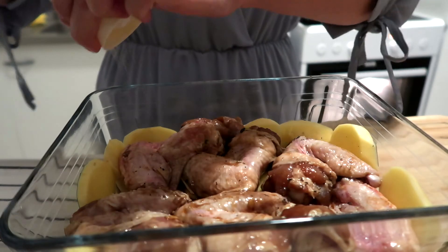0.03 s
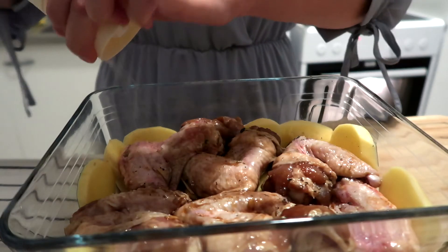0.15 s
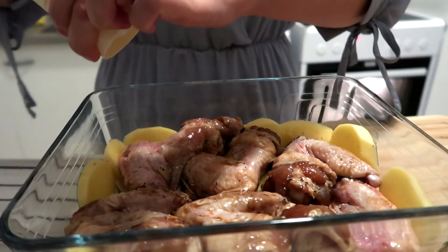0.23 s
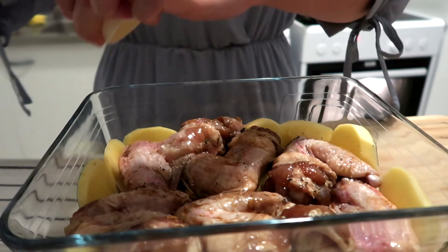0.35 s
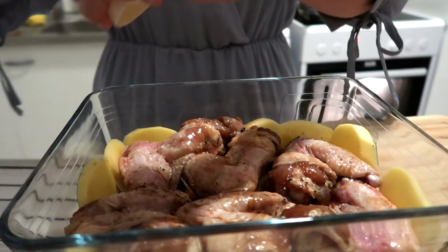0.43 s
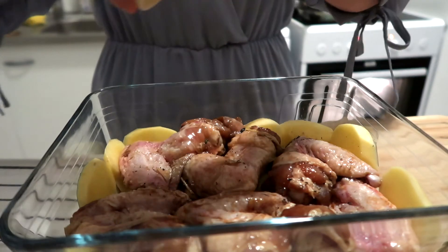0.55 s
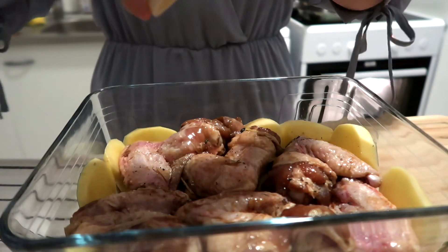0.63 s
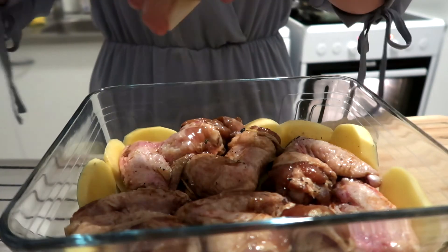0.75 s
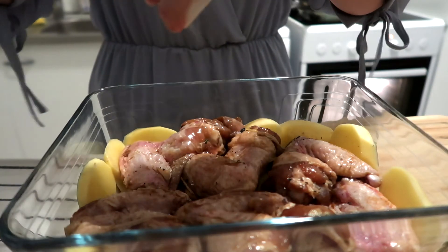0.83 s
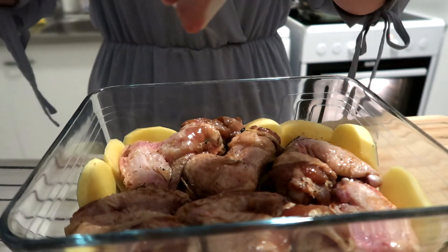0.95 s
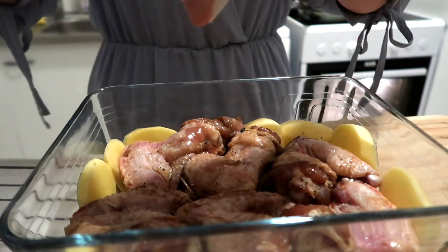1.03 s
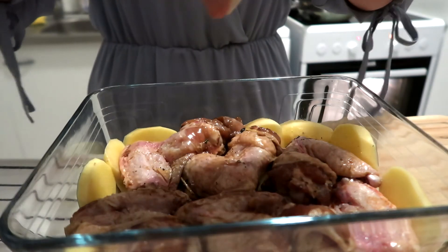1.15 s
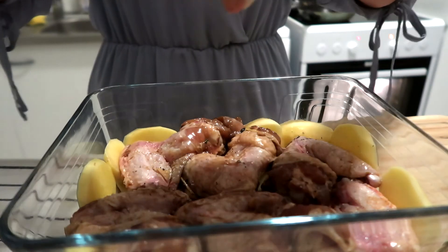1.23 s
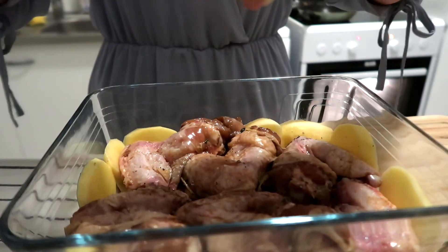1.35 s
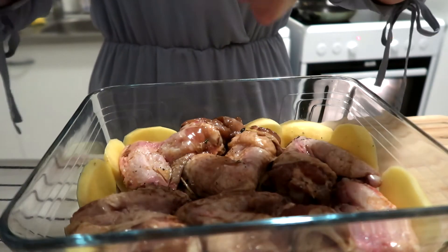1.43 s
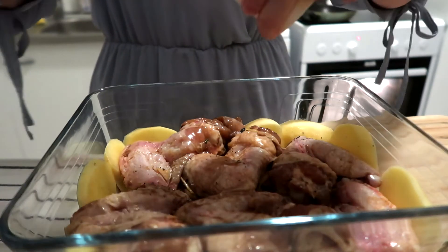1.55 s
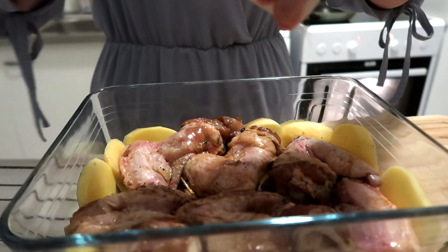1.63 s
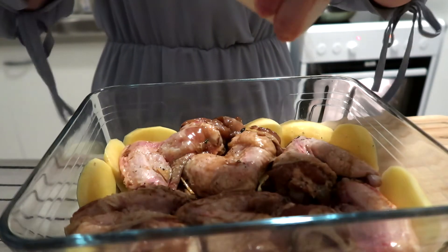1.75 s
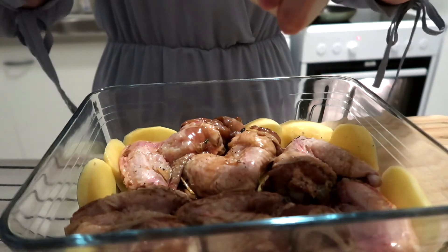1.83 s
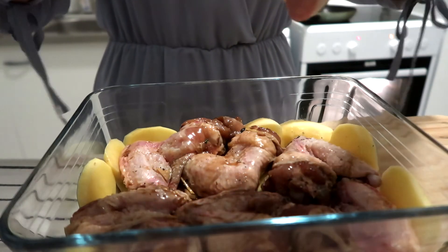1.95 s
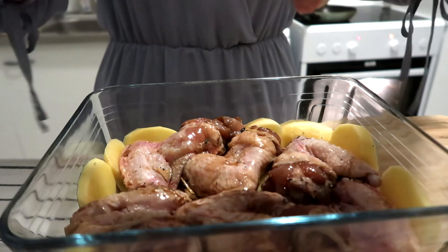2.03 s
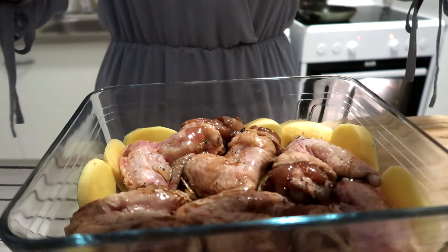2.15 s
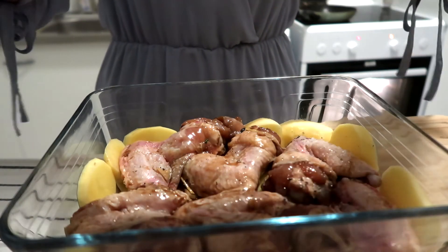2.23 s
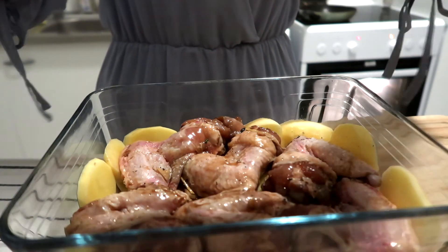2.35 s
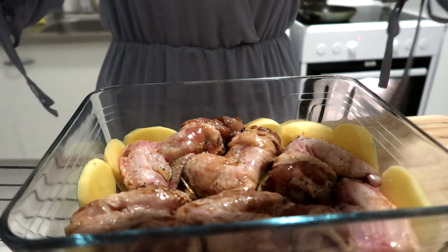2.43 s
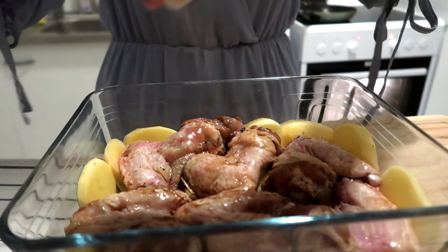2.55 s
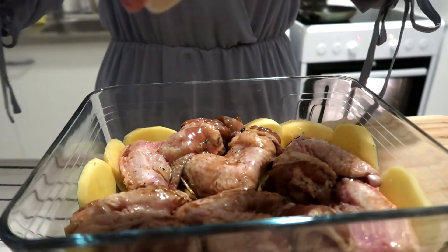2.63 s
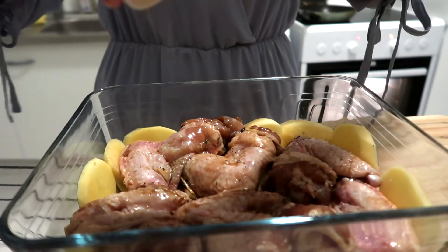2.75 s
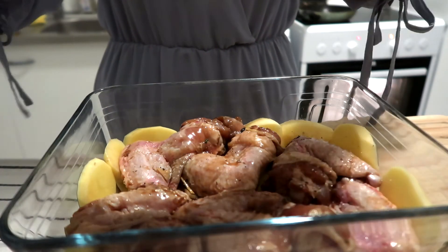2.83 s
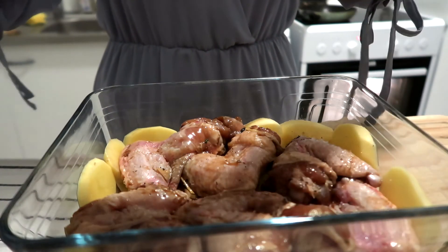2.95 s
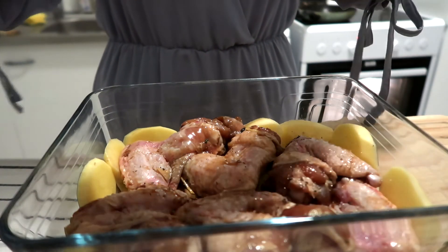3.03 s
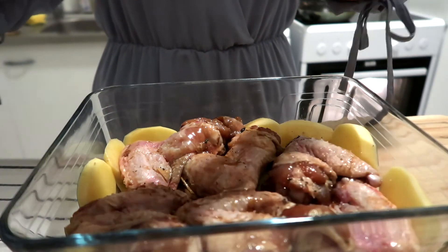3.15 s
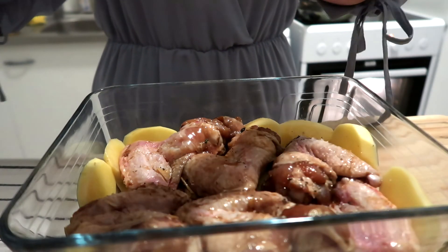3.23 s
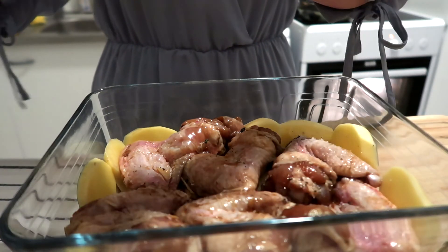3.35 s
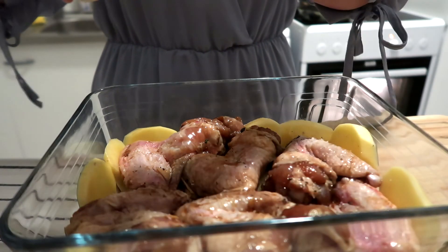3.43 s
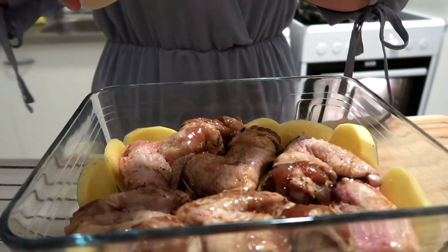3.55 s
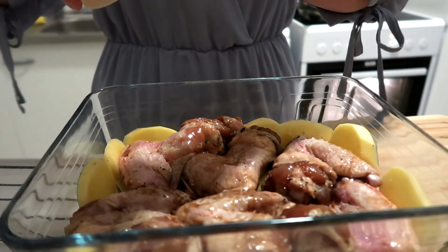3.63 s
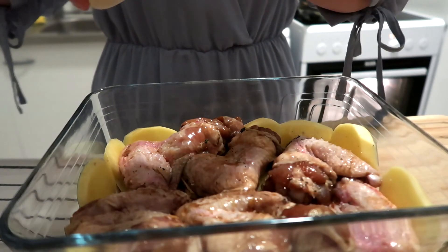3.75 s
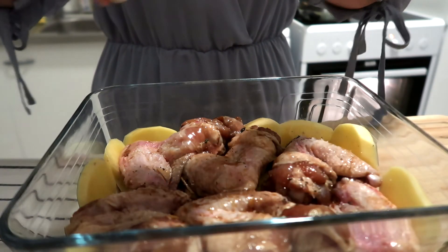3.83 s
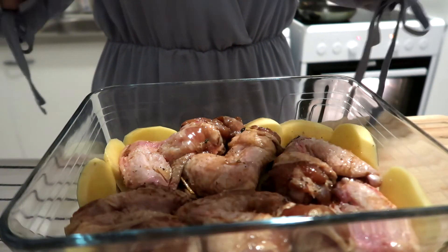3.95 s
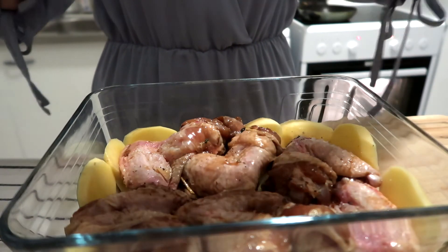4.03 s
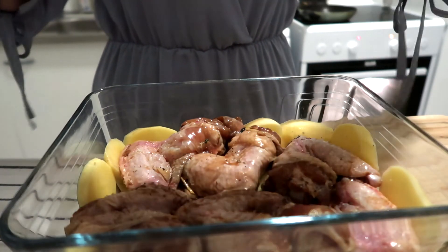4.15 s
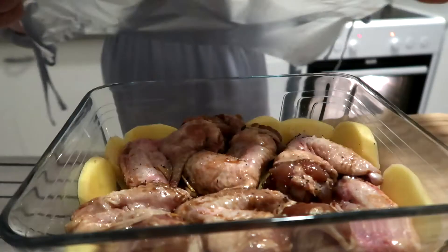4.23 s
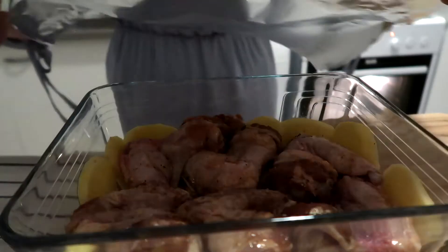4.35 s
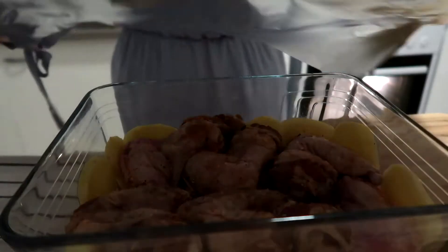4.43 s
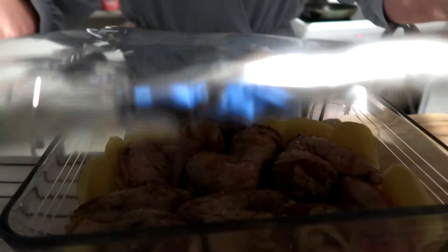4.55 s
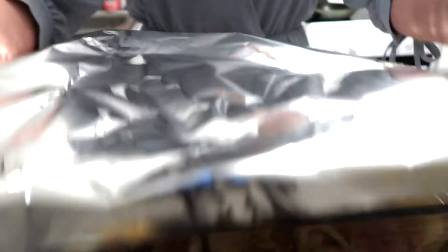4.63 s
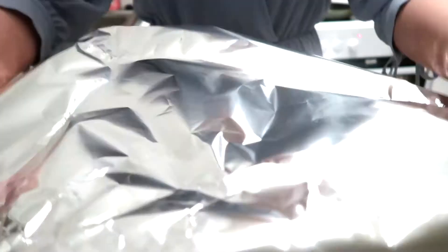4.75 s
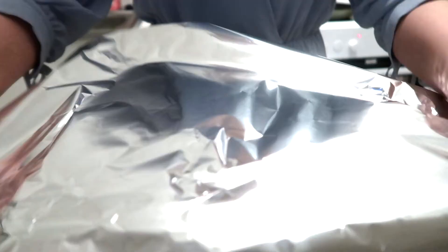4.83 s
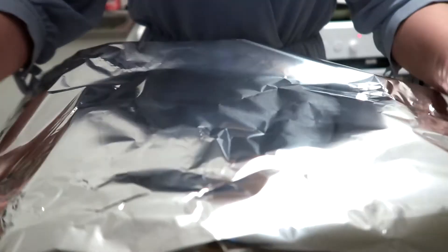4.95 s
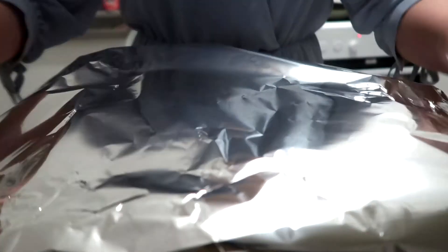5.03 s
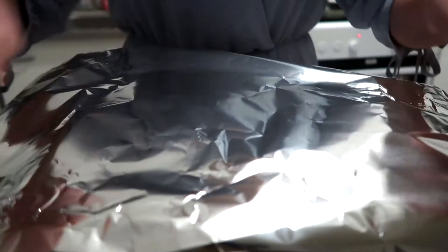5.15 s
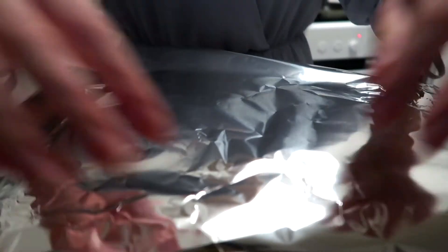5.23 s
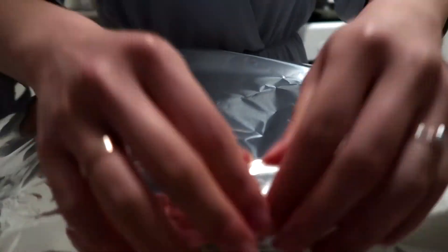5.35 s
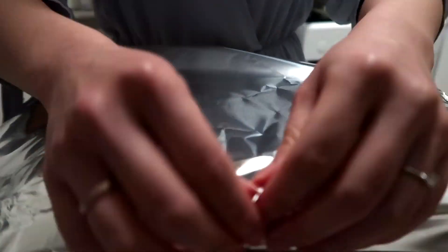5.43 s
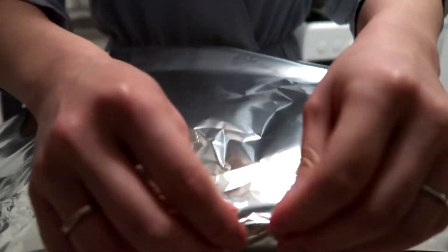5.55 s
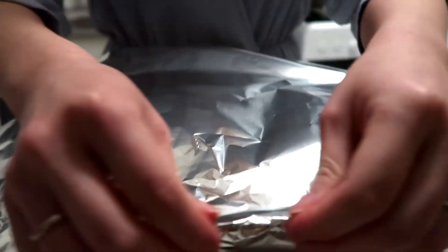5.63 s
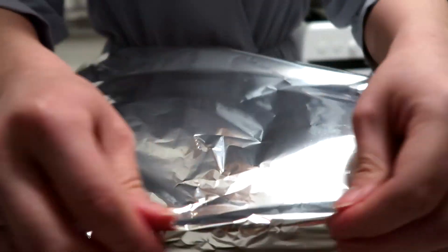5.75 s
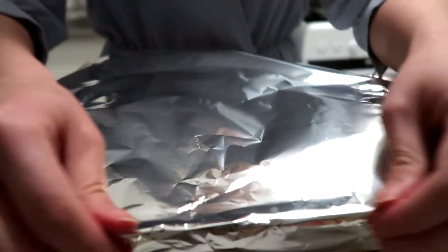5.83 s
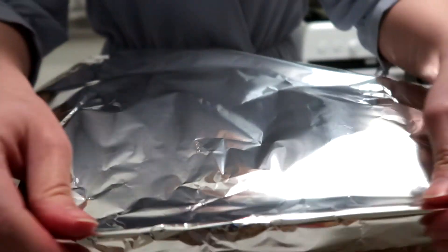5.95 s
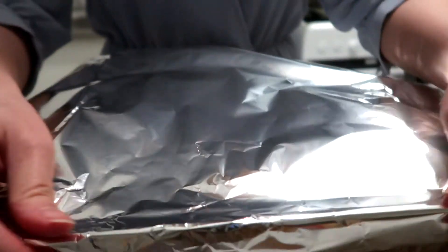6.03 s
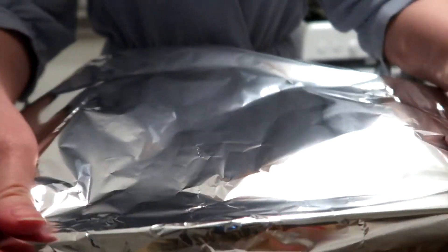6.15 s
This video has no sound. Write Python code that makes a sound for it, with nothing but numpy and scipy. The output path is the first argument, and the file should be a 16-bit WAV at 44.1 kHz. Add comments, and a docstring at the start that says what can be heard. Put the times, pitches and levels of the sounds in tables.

```python
"""In a small kitchen, aluminium foil is pulled off its roll in short tugs, then spread over a glass dish
and pressed round the rim. Buckling facets are short ringing pops, each with a burst of noise; tiny creases
are clumped noise bursts that merge into a bright rush when the whole sheet moves. Resonances of roll and
dish and short, changing echoes colour the foil. Faint squeaks are narrow noise bands, low knocks are short
pops; a sine hum and the room's banded noise lie underneath."""
import sys
import numpy as np
from scipy import signal
from scipy.io import wavfile
from scipy.ndimage import uniform_filter1d

SR = 44100
rng = np.random.default_rng(int(sys.argv[2]) if len(sys.argv) > 2 else 0)


def inscribe(sig):
    """Save sig as 16-bit PCM at rate SR to the path in sys.argv[1].

    A 1-D sig is mono; a 2-D sig holds one channel per row.
    Samples are clipped to [-1, 1] before scaling.
    """
    pcm = np.round(np.clip(np.atleast_2d(sig).T, -1, 1) * 32767)
    wavfile.write(sys.argv[1], SR, pcm.astype(np.int16))


N = 273420
TIME = np.arange(N) / SR

# the strength (dB) at which the laws below give their usual level
USUAL_DB = -25
# lifting the sheet: (t/s, crinkle strength/dB, treble strength/dB)
LIFT = [(4.192, -39, -63), (4.2, -31, -30), (4.224, -33, -33), (4.402, -36.5, -37.5), (4.414, -33, -34.5),
        (4.464, -42.5, -39.5), (4.49, -34, -36.5)]
# big facets that buckle: (t/s, pop peak before trim/dB, f/Hz, shiver strength/dB)
SNAPS = [(0.0044, -10.5, 2080, -17.5), (0.024, -11, 2160, -23), (0.0721, -7.5, 1620, -26.5),
         (0.0894, -11.5, 2320, -21), (0.1339, -14.5, 1200, -19.5), (0.3334, -37, 1290, -62),
         (0.617, -20, 1500, -40.5), (0.66, -20, 2830, -28), (0.6814, -25, 1450, -25.5),
         (0.6946, -20, 1650, -31), (0.7262, -18, 1600, -28), (0.7687, -11, 1660, -21.5),
         (0.7754, -10, 1670, -22), (0.7809, -9, 1760, -18), (0.816, -30, 1650, -19),
         (0.8811, -25, 1540, -17.5), (0.9194, -29, 1770, -29.5), (0.9455, -30, 1590, -33),
         (1.4502, -13.5, 2240, -29), (1.4847, -13.5, 1100, -19), (1.5827, -15.5, 1500, -19),
         (1.6122, -12.5, 2190, -22), (1.68, -18.5, 1180, -24.5), (1.8312, -53, 1100, -56),
         (2.3016, -32.5, 1410, -38.5), (2.3128, -32, 2960, -32), (2.3332, -22, 3030, -40),
         (2.3478, -32, 2090, -40), (2.373, -21.5, 2130, -34), (2.4028, -11, 3120, -24),
         (2.4384, -25, 2110, -25.5), (2.4519, -16, 1500, -23.5), (2.4926, -7, 2930, -21),
         (2.5317, -15, 1650, -31), (2.6452, -20.5, 1380, -21.5), (2.6559, -15.5, 3200, -22.5),
         (2.748, -26.5, 1590, -52), (2.9841, -54, 1210, -53), (3.2198, -31, 2150, -35),
         (3.2535, -21, 1540, -26.5), (3.4047, -36, 1930, -52), (3.447, -32, 1740, -35),
         (3.5825, -45, 1850, -48), (3.678, -12.5, 2240, -32), (3.696, -20, 2360, -35),
         (3.9294, -55, 2120, -51), (4.03, -45, 2660, -59), (4.08, -53, 1320, -54),
         (4.2614, -14.5, 2240, -26), (4.4148, -18, 2110, -40), (4.5325, -6, 3380, -33),
         (4.6966, -7, 3730, -22.5), (4.7753, -10, 3500, -14), (4.7916, -6, 2610, -17),
         (4.8294, -20, 3100, -14), (4.95, -14, 2070, -20), (5.0026, -14, 2530, -25),
         (5.0912, -21, 1560, -24.5), (5.4704, -7, 2110, -17.5), (5.534, -9.5, 2550, -24),
         (5.5633, -4.5, 2100, -21), (5.5784, -8.5, 2500, -27), (5.7473, -9.5, 2130, -24),
         (5.7887, -14, 2350, -23), (5.871, -16, 2500, -30), (6.1829, -12, 2200, -19)]
# low knocks, when a wide stretch of foil flaps: (t/s, peak before trim/dB, f/Hz)
KNOCKS = [(0.099, -20.5, 660), (0.135, -12, 606), (0.618, -21, 970), (1.485, -17, 700), (4.263, -22, 457),
          (4.777, -15, 593), (4.856, -12, 557), (5.535, -15, 660), (5.578, -18, 710), (5.747, -19, 615),
          (5.79, -17.5, 505)]


def from_db(db):
    """Decibels to gain."""
    return 10 ** (np.asarray(db) / 20)


def rms_one(x):
    """Scale to unit power."""
    return x / np.sqrt(np.mean(x ** 2) + 1e-20)


def at_hz(points, hz):
    """Read a table on a log-frequency axis."""
    points = np.array(points)
    return np.interp(np.log(hz), np.log(points[:, 0]), points[:, 1])


def filtered(x, hz, kind, order=2):
    """Butterworth filter."""
    sos = signal.butter(order, hz, kind, fs=SR, output="sos")
    return signal.sosfilt(sos, x + 1e-18)


def resonance(x, hz, width_hz):
    """Two-pole resonance with gain close to 1 on top."""
    r = np.exp(-np.pi * width_hz / SR)
    zeros = (1 - r * r) / 2 * np.array([1, 0, -1])
    poles = [1, -2 * r * np.cos(2 * np.pi * hz / SR), r * r]
    return signal.lfilter(zeros, poles, x)


def dying(power, seconds):
    """Each burst of power dies away exponentially; its amplitude falls to 1/e in the given time."""
    return signal.lfilter([1], [1, -np.exp(-2 / (seconds * SR))], power + 1e-18)


def wobble(size):
    """Random line through knots of spread 1, one every size samples."""
    knots = rng.standard_normal(N // size + 2)
    return np.interp(np.arange(N) / size, np.arange(len(knots)), knots)


def band_bank(colour, edges):
    """Centres and gains of neighbouring bands, and the power that each passes of white noise."""
    centres = np.sqrt(edges[:-1] * edges[1:])
    gains = from_db(at_hz(colour, centres))
    return centres, gains, gains ** 2 * np.diff(edges) * 2 / SR


def background(count):
    """Room rumble and mains hum, alike on both sides in the deep bass and diffuse above."""
    # colour of the room noise: (f/Hz, level/dB)
    room_colour = [(15, -29), (25, 1.5), (231, -4.5), (301, -6.5), (1000, -16.5), (1420, -16.5),
                   (1580, -40), (2070, -16), (3010, -21), (4500, -25), (10000, -33.5), (10900, -25),
                   (15000, -40)]
    # side share of the room noise: (f/Hz, level/dB)
    room_width = [(40, -32), (70, -22), (130, -7), (260, -0.5), (500, 2), (1500, -2.5), (5000, -2),
                  (12000, 1)]
    # level and width of the background over time: the level dips around 4.8 s and recovers,
    # the width shrinks and stays narrow: (t/s, level/dB, width/dB)
    level_and_width = [(0, 1, 0.5), (4.2, 1, 1), (4.3, 0.5, -4), (4.8, -7, -4), (5.3, -0.5, -9.5),
                       (5.6, 0.5, -13), (6.2, 3, -13)]
    # levels ahead of that curve
    room_db, hum_hz, hum_db = -54, 102.6, -63.5

    edges = np.geomspace(38, 16000, count + 1)
    centres, gains, passed = band_bank(room_colour, edges)
    white, out = rng.standard_normal((2, 2, N)), 0
    for k, hz in enumerate(centres):
        band = filtered(white[k % 2], edges[k:k + 2], "band")
        out = out + gains[k] * from_db([[0], [at_hz(room_width, hz)]]) * band
    mid, side = from_db(room_db) * out / np.sqrt(passed.sum())

    s, *columns = np.transpose(level_and_width)
    level, width = [from_db(np.interp(TIME, s, column)) for column in columns]
    hum = from_db(hum_db) * np.sqrt(2) * np.sin(2 * np.pi * hum_hz * TIME)
    return level * (mid + hum + width * side * [[1], [-1]])


def echoes(near_db, near_s, tail_db):
    """Response from one place: quick reflections off dish and worktop, then a tail dying band by band."""
    # kitchen reverberation: (f/Hz, t60/s)
    kitchen_t60 = [(200, 0.11), (1400, 0.21), (3700, 0.26), (10000, 0.18)]
    t, edges = TIME[:SR // 2], np.geomspace(80, 17000, 9)
    near = rng.standard_normal((2, len(t))) * np.exp(-t / near_s) * (t > .001)
    white, tail = rng.standard_normal((2, 2, len(t))), 0
    for k, (low, high) in enumerate(zip(edges, edges[1:])):
        t60 = at_hz(kitchen_t60, np.sqrt(low * high))
        tail = tail + filtered(white[k % 2], [low, high], "band") * from_db(-60 * t / t60)
    near = from_db(near_db) * rms_one(near)
    tail = from_db(tail_db) * rms_one(tail * (t > .007))
    return (near + tail) / np.sqrt(len(t))


def kitchen(x, count):
    """The crackle jumps from place to place on the foil, so its reflections keep changing."""
    place_s = .016  # time from one random choice of place to the next
    moments = np.arange(0, TIME[-1] + place_s, place_s)
    place, out = rng.integers(0, count, len(moments)), x
    for k in range(count):
        share = np.sqrt(np.interp(TIME, moments, place == k))
        response = echoes(near_db=-1.5, near_s=.005, tail_db=-7.5)
        out = out + signal.oaconvolve(x * share, response, axes=1)[:, :N]
    return out


def squeaks():
    """Sliding foil sings faintly in narrow bands: noise through two equal resonances, swelling and fading."""
    # squeaks and hisses: (start t/s, end t/s, f/Hz, width/Hz, level/dB)
    slides = [(0.13, 0.315, 11300, 1800, -58), (0.444, 0.647, 2900, 350, -64),
              (0.9, 1.094, 11200, 1800, -58), (1.648, 1.808, 10840, 1100, -43),
              (1.68, 1.773, 6040, 500, -51), (2.042, 2.345, 2850, 382, -58),
              (3.9, 4.167, 11200, 1780, -55.5)]
    out = np.zeros(N)
    for start, end, hz, width_hz, db in slides:
        swell = np.sqrt(np.interp(TIME, [start, (start + end) / 2, end], [0, 1, 0]))
        band = resonance(resonance(rng.standard_normal(N), hz, width_hz), hz, width_hz)
        out += from_db(db) * swell * rms_one(band)
    return out


def facets(snaps, cycles):
    """A facet that flips over swells for the given cycles and rings briefly, at the pitch given in its row."""
    out, t = np.zeros(N), TIME[:SR // 50]
    for s, peak_db, hz, *_ in snaps:
        at, age = max(round(s * SR), 0), hz * t / cycles
        pop = from_db(peak_db) * np.sin(2 * np.pi * hz * t) * age * np.exp(1 - age)
        out[at:at + len(t)] += rng.choice([-1, 1]) * pop[:N - at]
    return out


def small_facets(gain, start, end, centre_hz, octaves, spread_db, count):
    """Facets of all sizes flip at random, as loud as the motion: rows (t/s, peak/dB, f/Hz)."""
    when, size, pitch = rng.random((count, 3)).T
    s = start + when * (end - start)
    peak_db = 20 * np.log10(np.interp(s, TIME, gain) + 1e-9) + spread_db * size ** 2
    hz = centre_hz * 2 ** (octaves * (2 * pitch - 1))
    return np.transpose([s, peak_db, np.minimum(hz, SR / 3)])


def knocks():
    """A wide stretch of foil flaps: a low facet pop."""
    return from_db(-8.5) * facets(KNOCKS, cycles=0.91)


def flap_power():
    """Body power of the loose foil that goes on flapping after each knock."""
    power = np.zeros(N)
    for s, peak_db, _ in KNOCKS:
        power[round(s * SR)] += from_db(peak_db - 20.5) ** 2
    return dying(power, .035)


def registers(db, law):
    """Power of body, crinkle and fizz for a fold of the given strength, each growing by its own law."""
    return np.array([from_db(usual_db + follows * (db - USUAL_DB)) ** 2 for usual_db, follows in law])


def snap_power(snaps, law, shiver_s):
    """After each snap a shiver spreads over the foil within a moment and dies; power in three registers."""
    swell_s = 0.00076
    power, r = np.zeros((3, N)), np.exp(-1 / (swell_s * SR))
    for s, *_, shiver_db in snaps:
        power[:, max(round(s * SR), 0)] += registers(shiver_db, law)
    return signal.lfilter([1 - r], [1, -r], dying(power, shiver_s))


def creases(per_s, spread_db, clump_db, settle_s):
    """Power of tiny creases giving way: random sizes, arriving in clumps, running mean about 1."""
    clumps = from_db(clump_db * rms_one(uniform_filter1d(rng.standard_normal(N), size=300)))
    sizes = from_db(spread_db * np.minimum(rng.exponential(1, N), 4)) * clumps
    power = (rng.random(N) < per_s / SR) * sizes ** 2
    power = signal.lfilter([1], [1, -np.exp(-2 / (settle_s * SR))], power + 1e-9)
    return power / uniform_filter1d(power, size=1800)


def excite(power, colour, patchy_db, count):
    """Body, crinkle and fizz shake a bank of noise bands, whose levels wander by patchy_db; mid and side."""
    # limits between which each register's power is shared out (f/Hz)
    register_edges = (90, 900, 4500, 16000)
    # where body, crinkle and fizz each reign, low and high end in turn (f/Hz); in between they blend
    register_spans = (90, 650, 1200, 3300, 6300, 16000)
    edges = np.geomspace(register_edges[0], register_edges[-1], count + 1)
    centres, gains, passed = band_bank(colour, edges)
    passed_by_register = np.histogram(centres, register_edges, weights=passed)[0]
    drives = np.sqrt(power / passed_by_register[:, None])
    white, out = rng.standard_normal((2, 2, N)), 0
    for k, hz in enumerate(centres):
        blend = np.array([np.interp(hz, register_spans, np.repeat(own, 2)) for own in np.eye(len(power))])
        favour = rms_one(from_db(patchy_db * wobble(size=400)))
        drive = gains[k] * favour * (blend @ drives)
        out = out + filtered(drive * white[k % 2], edges[k:k + 2], "band")
    return out


def foil(power, pops, colour, modes, patchy_db, side_db):
    """Creases and snaps sound through the foil's colour and resonances; mid and side."""
    mid, side = excite(power, colour, patchy_db, count=25)
    out = np.array([mid + pops, from_db(side_db) * side])
    return out + sum(from_db(db) * resonance(out, hz, width) for hz, width, db in modes)


def pull():
    """Rise, hold and release of every tug; its weight and ring last until the next. Three curves in dB."""
    # tugs on the roll: (start t/s, rise/s, length until release/s, crackle strength/dB,
    # weight of the body/dB, treble ring of the taut strip/dB)
    tug_rows = [(0.0, 0.0033, 0.13, -34.5, -2, 0), (0.612, 0.2, 0.32, -44, -9, -6),
                (1.456, 0.023, 0.062, -35, -0.5, -3), (1.562, 0.018, 0.086, -30.5, -3, -12),
                (2.311, 0.17, 0.17, -38.5, -4, 1), (2.624, 0.011, 0.018, -43, -8.5, -2),
                (3.204, 0.028, 0.032, -51, -4, 8), (3.38, 0.013, 0.086, -70, -17, 3),
                (3.637, 0.02, 0.025, -57, 1, 6.5), (3.903, 0.03, 0.16, -64, -17, 2.5)]
    settle_db_per_s = 177  # decay once the hand stops pulling
    effort, weight_db, ring_db = np.full(N, 1e-6), np.zeros(N), np.zeros(N)
    for start, rise, length, db, weight, ring in tug_rows:
        settled_db = settle_db_per_s * np.maximum(TIME - start - length, 0)
        effort += np.clip((TIME - start) / rise, 0, 1) * from_db(db - settled_db)
        weight_db[TIME >= start] = weight
        ring_db[TIME >= start] = ring
    return 20 * np.log10(effort), weight_db, ring_db


def stray_ticks(end, count):
    """The foil ticks faintly by itself as it relaxes, at random moments: rows (t/s, shiver strength/dB)."""
    when, size = rng.random((count, 2)).T
    return np.transpose([when * end, -82 + 21 * size ** 2])


def tugs():
    """Foil comes off the roll: separate snaps over sparse crackle, with the taut strip ringing on top."""
    # colour of the tugged foil: (f/Hz, level/dB)
    tug_colour = [(90, -8), (150, -8.5), (300, -15), (560, -8.5), (820, -16.5), (1100, -9.5), (1600, -8),
                  (2400, -6), (3800, -12.5), (5200, -8.5), (7400, -6.5), (9300, -7.5), (10900, -7.5),
                  (13300, -3.5), (15500, -21)]
    # resonances of the roll: (f/Hz, width/Hz, level/dB)
    roll_modes = [(630, 40, -10), (1190, 50, -10.5), (1650, 150, -6), (3160, 97, -22)]
    # crackle, rows body, crinkle, fizz: (level at usual strength/dB, gain per dB of strength/dB)
    crackle_law = [(-37.5, 0.86), (-26.5, 0.96), (-39, 0.64)]
    # snaps, same rows and columns; faint ones sound thin and bright
    snap_law = [(-32.5, 1), (-25.5, 0.91), (-35.5, 0.52)]

    effort_db, weight_db, ring_db = pull()
    end = LIFT[0][0]
    snaps = [row for row in SNAPS if row[0] < end]
    # a snap sets off the creases around it
    aftermath = from_db(-13.5) ** 2 * snap_power(snaps, snap_law, shiver_s=.012)
    strain = registers(effort_db, crackle_law) + aftermath
    power = strain * creases(per_s=900, spread_db=2.5, clump_db=1.0, settle_s=0.0007)
    power += snap_power(snaps, snap_law, shiver_s=.0035)
    power += snap_power(stray_ticks(end, count=22), snap_law, shiver_s=0.0022)
    power[0] *= from_db(weight_db) ** 2

    flips = small_facets(from_db(effort_db), 0, end, centre_hz=2680, octaves=1.1, spread_db=16, count=330)
    pops = from_db(-2.0) * facets(snaps, cycles=0.69)
    pops += from_db(2) * facets(flips, cycles=0.42)
    out = foil(power, pops, tug_colour, roll_modes, patchy_db=1.5, side_db=-0.5)
    return out + from_db(ring_db) * resonance(out, hz=5500, width_hz=630)


def sheet():
    """The whole sheet is lifted, spread and pressed: crackle thickens with the motion, bigger snaps on top."""
    # spreading, then pressing: (t/s, crinkle strength/dB, treble strength/dB)
    spread = [(4.49, -37, -32), (4.52, -27.5, -20), (4.572, -25, -18.5), (4.684, -30.5, -33.5),
              (4.728, -24, -19), (4.762, -24.5, -24), (4.834, -20, -19), (4.896, -25.5, -27),
              (5.002, -26, -27), (5.046, -30, -34.5), (5.11, -30.5, -32), (5.306, -45, -66),
              (5.42, -37.5, -46)]
    press = [(5.42, -39.5, -47), (5.454, -23.5, -25.5), (5.684, -24, -26), (5.738, -30.5, -36),
             (5.75, -28, -26), (5.768, -31.5, -35.5), (5.882, -22.5, -23), (5.918, -24, -27),
             (6.2, -24.5, -26.5)]
    # colour of the sheet: (f/Hz, level/dB)
    sheet_colour = [(90, -13), (145, -13), (320, -14.5), (450, -10), (620, -6), (860, -10.5), (1160, -1.5),
                    (1880, -5), (2500, -1), (3900, -4), (5170, -3.5), (9000, -10.5), (12800, -8),
                    (15000, -18)]
    # resonances of the sheet over the dish: (f/Hz, width/Hz, level/dB)
    dish_modes = [(446, 21, -10.5), (620, 120, -10.5), (1100, 40, -10), (1590, 40, -7), (2370, 320, -6),
                  (3090, 100, -9.5), (4030, 62, -16)]
    # crackle, rows body, crinkle: (level at usual strength/dB, gain per dB of strength/dB)
    crackle_law = [(-40.5, 0.9), (-26, 1.06)]
    # snaps, rows body, crinkle, fizz, same columns; faint ones sound thin and bright
    snap_law = [(-46.5, 2.24), (-24.5, 0.82), (-24, 0.79)]

    s, *levels = np.transpose([*LIFT, *spread[1:], *press[1:]])
    start, end = LIFT[0][0], TIME[-1]
    crinkle_db, treble_db = [np.interp(TIME, s, db) for db in levels]
    snaps = [row for row in SNAPS if row[0] >= start]
    fizz = from_db(treble_db + 0.16) ** 2
    strain = np.vstack([registers(crinkle_db, crackle_law), fizz])
    # creases per second: 1900 at the usual strength, more in stronger motion
    rate = 1900 * from_db(.8 * (crinkle_db - USUAL_DB))
    power = strain * creases(rate, spread_db=1.5, clump_db=0.5, settle_s=0.00062)
    power += snap_power(snaps, snap_law, shiver_s=.0045)
    power[0] += flap_power()
    power = power * (TIME >= start)

    flips = small_facets(from_db(crinkle_db), start, end, centre_hz=2750, octaves=1.0, spread_db=9.5, count=240)
    ticks = small_facets(from_db(treble_db), start, end, centre_hz=7200, octaves=1.0, spread_db=5, count=300)
    pops = from_db(-6) * facets(snaps, cycles=1.57)
    pops += from_db(-2.0) * facets(flips, cycles=1.14)
    pops += from_db(1) * facets(ticks, cycles=0.96)
    return foil(power, pops, sheet_colour, dish_modes, patchy_db=0.0, side_db=0.0)


def scene():
    """Foil in the kitchen, heard by two close microphone ports that differ mostly in the treble."""
    dry = tugs() + sheet()
    dry[0] += squeaks() + knocks()
    mid, side = kitchen(dry, count=6)
    treble = from_db(6) * filtered(filtered(side, 3430, "high", order=10), 12600, "high", order=1)
    bass = from_db(-29.0) * filtered(side, 490, "low", order=2)
    side = treble + bass
    return from_db(-1.42) * (mid + side * [[1], [-1]]) + background(count=16)


def record(dry):
    """Peaks are rounded, the microphone rolls off and the top is cut."""
    rounded = 1.114 * np.tanh(dry / 1.337)
    heard = filtered(rounded, 14300, "low", order=4)
    return filtered(heard, 15700, "low", order=20)


dry = scene()
out = record(dry)
inscribe(out)
```